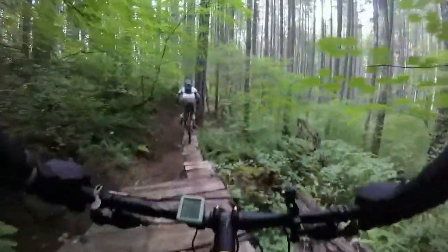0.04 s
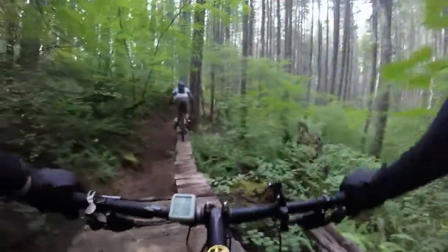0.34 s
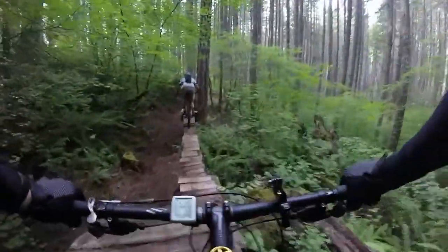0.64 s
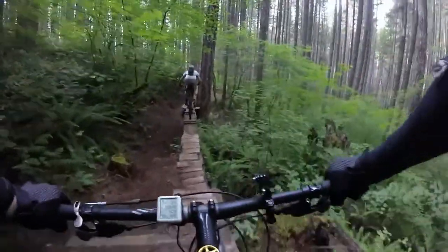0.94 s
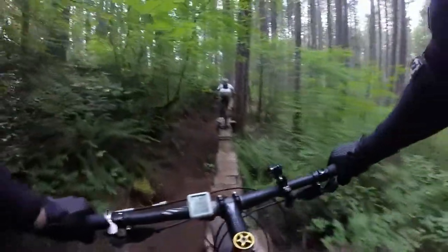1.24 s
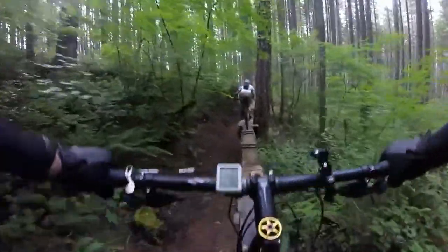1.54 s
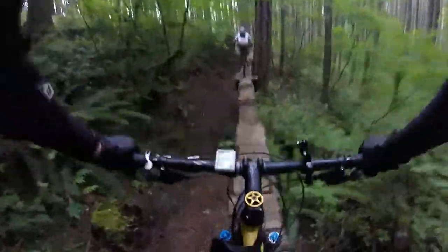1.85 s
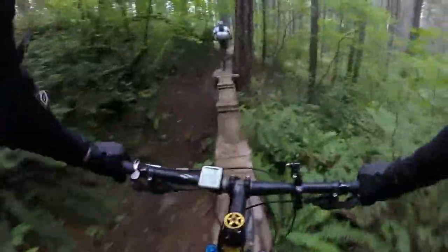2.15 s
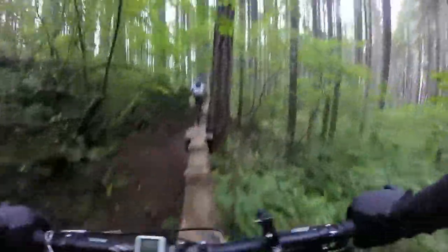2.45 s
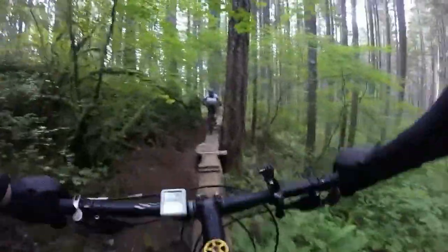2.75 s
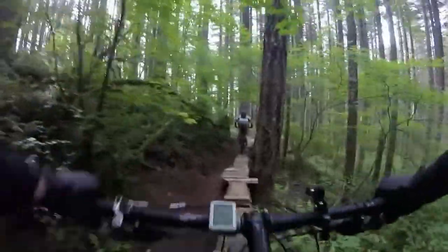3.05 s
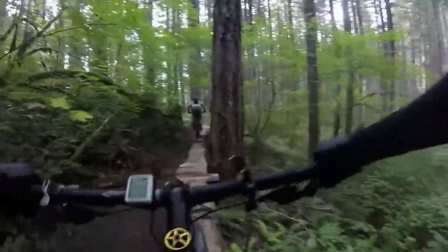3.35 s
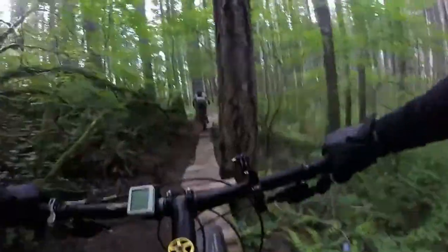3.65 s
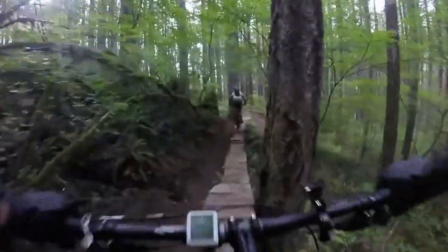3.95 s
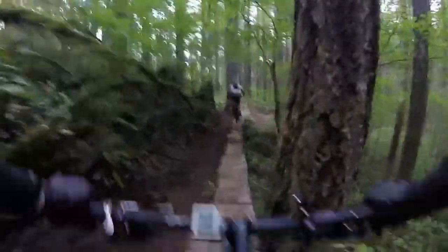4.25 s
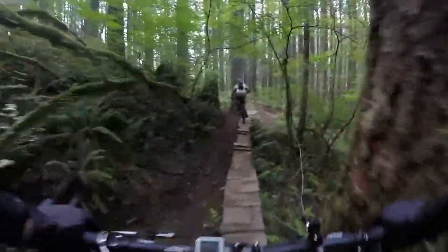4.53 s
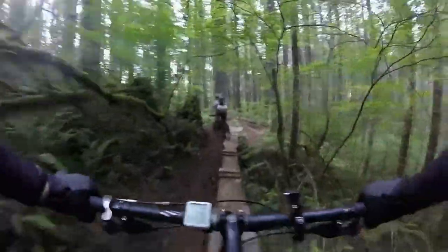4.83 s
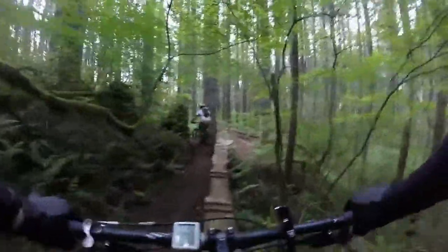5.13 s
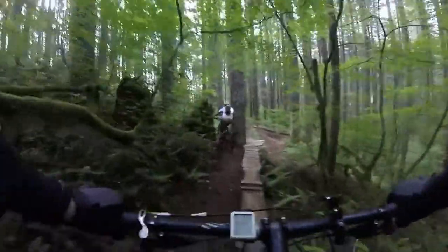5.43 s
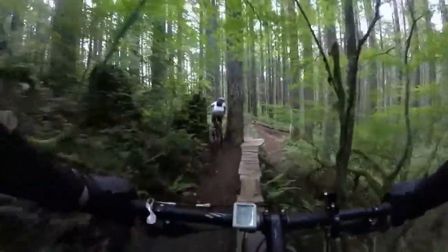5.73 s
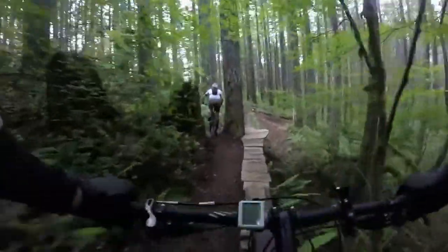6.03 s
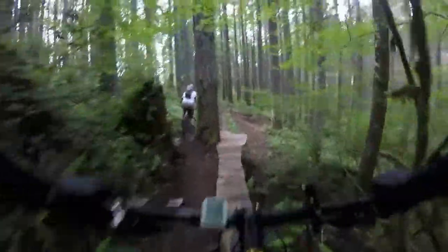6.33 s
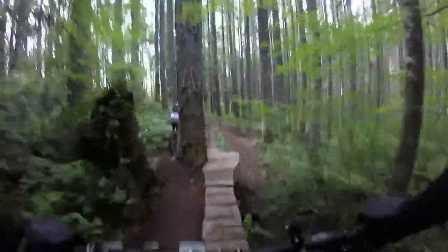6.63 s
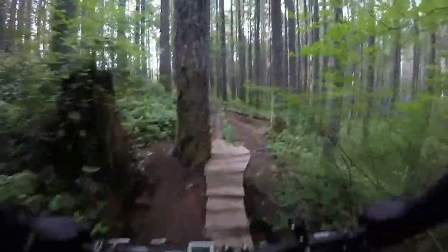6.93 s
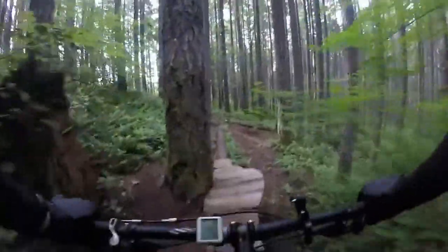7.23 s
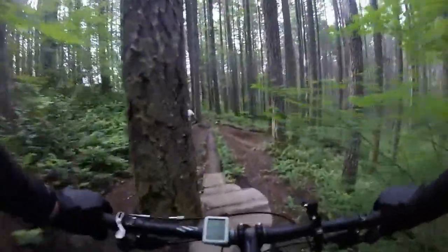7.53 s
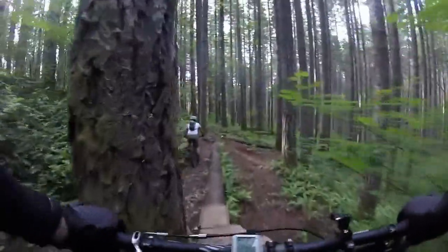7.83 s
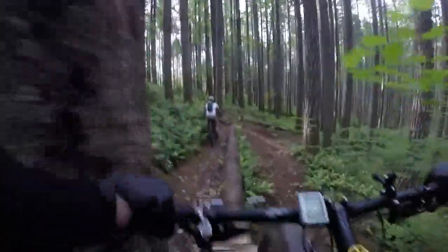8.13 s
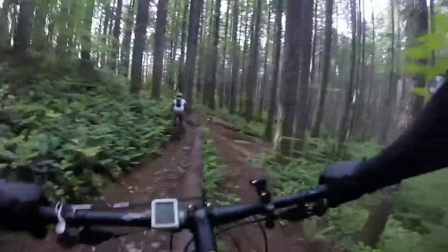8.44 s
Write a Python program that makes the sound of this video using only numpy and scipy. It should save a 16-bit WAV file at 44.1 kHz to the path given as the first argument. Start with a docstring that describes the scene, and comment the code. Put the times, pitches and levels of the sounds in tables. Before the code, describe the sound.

Bike tyres crunch and thud along a boardwalk while the chain clacks and brakes chirp, over rushing air and a soft double pulse.

```python
"""Mountain bike on a forest boardwalk

Heard from the rider's chest, a bike coasts over planks in a soft rush of air. The tyres crunch on grit
and thump on the boards; drops jolt the frame and make chain and cables clack. The freehub ticks and rasps
once, a brake disc scrapes and squeaks, and a soft double pulse, likely the rider's heart, beats below."""
import sys
import numpy as np
from scipy import signal
from scipy.fft import rfft, irfft, next_fast_len
from scipy.io import wavfile
from scipy.ndimage import uniform_filter1d

SR = 44100
rng = np.random.default_rng(int(sys.argv[2]) if len(sys.argv) > 2 else 0)


def put_to_file(sound):
    """Save the sound as 16-bit audio at rate SR, in the file named by the first command-line argument."""
    columns = np.atleast_2d(sound).T  # one column per channel
    safe = np.clip(columns, -1, 1)
    whole_steps = np.round(safe * 32767)
    wavfile.write(sys.argv[1], SR, whole_steps.astype(np.int16))


N = 378378
TIME = np.arange(N) / SR


def gain_of(db):
    """Decibels to amplitude."""
    return 10 ** (np.asarray(db) / 20)


def unit_rms(x):
    """Scales to an rms of one."""
    return x / np.sqrt(np.mean(x ** 2) + 1e-20)


def unit_peak(x):
    """Scales the loudest 3 ms to an rms of one."""
    return x / np.sqrt(uniform_filter1d(x ** 2, 130).max() + 1e-20)


def level(rows):
    """Gain along a curve of (s, dB)."""
    return gain_of(np.interp(TIME, *np.transpose(rows)))


def add(mix, start_s, sound):
    """Lays a sound into the mix."""
    part = mix[max(round(start_s * SR), 0):][:len(sound)]
    part += sound[:len(part)]


def coloured(x, points):
    """Shapes the spectrum by (Hz, dB) points, at unit rms."""
    point_hz, point_db = np.transpose(points)
    size = next_fast_len(len(x))
    hz = np.fft.rfftfreq(size, 1 / SR)
    curve_db = np.interp(np.log(hz + 1), np.log(point_hz + 1), point_db)
    return unit_rms(irfft(rfft(x, size) * gain_of(curve_db), size)[:len(x)])


def band(x, lo_hz, hi_hz, order=2):
    """Causal band-pass."""
    return signal.sosfilt(signal.butter(order, [lo_hz, hi_hz], "bandpass", fs=SR, output="sos"), x)


def drift(per_s):
    """Smooth noise at unit rms, changing about per_s times a second."""
    size = next_fast_len(N)
    hz = np.fft.rfftfreq(size, 1 / SR)
    spectrum = rfft(rng.standard_normal(size)) * np.exp(-(hz / per_s) ** 2)
    return unit_rms(irfft(spectrum, size)[:N])


def swell(peak_s, length_s, rise_share):
    """Gain that peaks at one and stays within 20 dB of that for length_s."""
    out, on = np.zeros(N), abs(TIME - peak_s) < 3 * length_s
    t = TIME[on] - peak_s
    out[on] = gain_of(-20 * np.maximum(-t / rise_share, t / (1 - rise_share)) / length_s)
    return out


def push(hz, rise_cycles, sharpness):
    """A heavily damped swing that builds and dies within a few cycles."""
    cycles = hz * np.arange(SR // 4) / SR
    rise = cycles / rise_cycles
    return (rise * np.exp(1 - rise)) ** sharpness * np.sin(2 * np.pi * cycles)


def struck(modes, t, detune=1):
    """Modes of (Hz, dB, t60 s) that start together and die away."""
    return sum(gain_of(db - 60 * t / t60) * np.sin(2 * np.pi * hz * detune * t) for hz, db, t60 in modes)


def resonator(x, hz, width_hz):
    """One driven mode."""
    return signal.lfilter(*signal.iirpeak(hz, hz / width_hz, SR), x)


def resonances(x, modes):
    """Drives modes of (Hz, width Hz, dB), at unit rms."""
    return unit_rms(sum(gain_of(db) * unit_rms(resonator(x, hz, width)) for hz, width, db in modes))


# Shaking of bike and rider, with wind. Each row: time in seconds, relative level in dB.
SHAKE_LEVEL = [(0.0, -35.5), (0.36, -44), (1.74, -44), (2.1, -37), (3.18, -39), (3.61, -38.5), (3.8, -32),
               (4.44, -37.5), (5.23, -40.5), (5.83, -44), (6.24, -33.5), (7.07, -36.5), (7.31, -33.5),
               (7.74, -39.5), (8.05, -44), (8.58, -33)]
# Its spectrum. Each row: frequency in Hz, relative density in dB.
SHAKE_SPECTRUM = [(6, -24.5), (12, 4), (25, 0), (34, -3.5), (46, -12), (60, -13.5), (90, -24), (140, -29),
                  (200, -37.5), (330, -42.5), (500, -44.5), (1100, -100)]

def shake(split_hz=48, calm_db=-42, rumble_exponent=0.6):
    """Low sway, evened out by the suspension, swells at each drop; the rumble above it grows less."""
    noise = coloured(rng.standard_normal(N), SHAKE_SPECTRUM)
    noise /= np.sqrt(uniform_filter1d(noise ** 2, 3000) + 0.02)
    sway = signal.sosfiltfilt(signal.butter(4, split_hz, fs=SR, output="sos"), noise)
    rumble = gain_of(-1) * (noise - sway)
    drops = sum(gain_of(db - 18) * swell(s, length_s=0.33, rise_share=0.33) for s, db, _ in JOLTS)
    unrest = np.hypot(gain_of(1) * level(SHAKE_LEVEL), drops) / gain_of(calm_db)
    return gain_of(calm_db) * (sway * unrest + rumble * unrest ** rumble_exponent)


# Tyres rolling on wood. Each row: time in seconds, level in dB.
ROLLING_LEVEL = [(0.0, -55.5), (0.26, -62), (0.91, -63), (1.89, -61.5), (2.08, -50), (2.2, -61.5),
                 (2.56, -49.5), (2.77, -60), (3.46, -60.5), (3.78, -56.5), (4.44, -55.5), (4.99, -62.5),
                 (5.59, -62.5), (6.71, -55.5), (6.86, -58.5), (7.86, -62.5), (8.46, -54.5), (8.58, -53)]
# A tyre pressed or steered hard. Each row: peak time in seconds, length in seconds, level in dB.
SCUFFS = [(1.637, 0.15, -51.5), (1.928, 0.036, -48), (2, 0.1, -36), (2.498, .1, -47.5), (2.619, .09, -47),
          (3.03, 0.31, -51.5), (3.732, 0.19, -45.5), (4.2, 0.053, -47.5), (4.282, 0.085, -45),
          (4.765, 0.085, -52), (6.354, .12, -63), (6.497, 0.07, -59), (6.62, .16, -50), (7.131, 0.2, -50.5),
          (7.29, 0.16, -55.5), (8.065, 0.32, -56), (8.306, 0.19, -42), (8.43, 0.24, -56)]

def tyre_load():
    """How hard the tyres work: rolling plus scuffs."""
    scuffing = sum(gain_of(db) * swell(s, length_s, rise_share=0.55) for s, length_s, db in SCUFFS)
    return np.hypot(level(ROLLING_LEVEL), scuffing)


def grit(grains_per_s=600, spread_db=3.5):
    """Crushed grains snap for a few cycles, each size at its own pitch."""
    out, t = np.zeros(N), np.arange(SR // 100) / SR
    pitches_hz = np.geomspace(900, 7000, num=14)
    for hz in pitches_hz:
        at = np.flatnonzero(rng.random(N) < grains_per_s / len(pitches_hz) / SR)
        impulses = np.zeros(N)
        impulses[at] = gain_of(spread_db * np.minimum(rng.exponential(1, N)[at], 4))
        snap = np.sin(2 * np.pi * hz * t) * np.exp(-hz * t / 2) * hz
        out += signal.oaconvolve(impulses, snap)[:N]
    return unit_rms(out)


# Crunch on gritty wood. Each row: frequency in Hz, relative density in dB.
TYRE_SPECTRUM = [(180, -30), (300, -11), (610, -10.5), (968, -7.5), (1120, -10), (1350, -4.5), (1540, -9),
                 (1670, -3), (2480, -5), (2740, -8), (3070, -10.5), (6250, -16.5), (7020, -22.5),
                 (10400, -31), (15500, -40)]

def tyres(frame_db=-7, grit_db=-5, drum_db=-8, knee_db=-65.5, flutter_db=2.5):
    """Knobs scrub the wood and crush grit; the frame rings along and the tread drums on the boards."""
    scrub = rng.standard_normal(N) + gain_of(frame_db) * resonances(rng.standard_normal(N), FRAME_MODES[1:])
    crunch = coloured(unit_rms(scrub) + gain_of(grit_db) * grit(), TYRE_SPECTRUM)
    drum = gain_of(drum_db) * unit_rms(band(rng.standard_normal(N), 105, 297))
    load = tyre_load()
    load = load ** 2 / np.hypot(load, gain_of(knee_db))  # light rolling sinks under the air
    return gain_of(flutter_db * drift(24)) * load * (crunch + drum)


# Passing air. Each row: frequency in Hz, relative density in dB.
AIR_SPECTRUM = [(120, -35), (200, -6.5), (333, -6), (665, -9), (1150, -11.5), (1330, -11), (1950, -15),
                (8200, -28), (13400, -37.5), (15500, -50)]

def air(db=-61.5, waver_db=0.97):
    """Soft rush of air past the rider."""
    return gain_of(db + waver_db * drift(12.4)) * coloured(rng.standard_normal(N), AIR_SPECTRUM)


# Frame and bars. Each row: frequency in Hz, width in Hz, gain in dB.
FRAME_MODES = [(1000, 220, 1), (1364, 71, -1), (1705, 113, 2), (2580, 540, 5.5), (3024, 150, 6),
               (3750, 150, 3), (4514, 150, 0), (4860, 270, -6.5), (6325, 120, -1), (7750, 210, -2),
               (10250, 260, -9.5), (11060, 300, -15)]

def frame(x, direct):
    """The bike resonates; a share of the sound passes straight through."""
    return direct * x + sum(gain_of(db) * resonator(x, hz, width) for hz, width, db in FRAME_MODES)


# Ticking that gets past the rider's body. Each row: time in seconds, relative level in dB.
TICK_LEVEL = [(0, -68), (.7, -64.5), (1.6, -69), (3, -64), (4.6, -65.5), (5.1, -85), (5.7, -76),
              (6.4, -67.5), (7.3, -70), (8.58, -68.5)]

def freehub_ticks(db=-5, teeth_per_s=50, unevenness=0.18, snap_s=0.0079, spread_db=2.5):
    """Pawls snap faintly over the ratchet at a wandering rate."""
    teeth = np.floor(np.cumsum(teeth_per_s * np.exp(unevenness * drift(12))) / SR)
    clicks = np.diff(teeth, prepend=0) * gain_of(spread_db * rng.standard_normal(N))
    decays = signal.lfilter([1], [1, -np.exp(-1 / (snap_s * SR))], clicks)
    snaps = frame(decays * rng.standard_normal(N), direct=0.23)
    return gain_of(db) * level(TICK_LEVEL) * unit_rms(band(snaps, 4900, 12100))


# Pads touching the disc. Each row: peak time in seconds, length in seconds, level in dB.
PAD_TOUCHES = [(0, 0.034, -41), (.09, 0.17, -52), (0.222, 0.17, -55.5), (4.52, 0.089, -54.5),
               (4.562, 0.085, -48)]
# The disc's low modes. Each row: frequency in Hz, width in Hz, relative level in dB.
DISC_MODES = [(1354, 26, 1.5), (1594, 38, -0.5), (2010, 56, -3), (2520, 35, 0)]

def brake_drag(scrape_db=-7, judder_db=2):
    """The pads scrape and judder on the disc and keep it ringing."""
    pressure = sum(gain_of(db) * swell(s, length_s, rise_share=0.53) for s, length_s, db in PAD_TOUCHES)
    rub = rng.standard_normal(N)
    scrape = gain_of(scrape_db) * unit_rms(band(rub, 380, 1800))
    return gain_of(judder_db * drift(90)) * (resonances(rub, DISC_MODES) + scrape) * pressure


# The disc sings. Each row: peak time in seconds, length in seconds, pitch in Hz, glide in Hz per second,
# waver in Hz, level in dB.
SQUEAKS = [(.003, 0.078, 1570, 0, 100, -48), (0.083, .05, 14800, 0, 100, -68),
           (.105, 0.2, 1350, -2, 50, -53.5), (.16, .06, 15260, 0, 30, -66),
           (2.411, .03, 4800, 15000, 300, -46), (2.471, .04, 4500, -15000, 300, -52),
           (4.488, .02, 3200, -5000, 200, -49.5), (4.565, .1, 1360, -2, 60, -51),
           (7.093, 0.053, 11270, -2200, 45, -34), (7.342, .05, 6850, 0, 100, -65),
           (7.42, .04, 8000, 0, 100, -68), (7.878, 0.077, 11800, -13000, 50, -64)]

def brake_squeaks(grab_db=2):
    """Disc modes waver in pitch and level as the pad sticks and slips."""
    out, slip = np.zeros(N), drift(520)
    grab = gain_of(grab_db * drift(150))
    for s, length_s, hz, glide_hz_per_s, waver_hz, db in SQUEAKS:
        on = abs(TIME - s) < 3 * length_s
        pitch_hz = hz + glide_hz_per_s * np.clip(TIME[on] - s, -length_s, length_s) + waver_hz * slip[on]
        tone = np.sqrt(2) * np.sin(2 * np.pi * np.cumsum(pitch_hz) / SR)
        out[on] += gain_of(db) * swell(s, length_s, rise_share=0.22)[on] * tone
    return grab * out


# The two thuds of a beat. Each row: delay in seconds, level in dB, pitch in Hz.
BEAT_THUDS = [(0, -34.5, 84), (0.229, -44.5, 95)]

def heartbeat(first_s=0.046, period_s=0.465, heave_db=-37, heave_hz=27, lead_s=0.021, spread_db=1.1):
    """A steady, soft double thud in the chest; a low heave leads each pair."""
    out, starts = np.zeros(N), np.arange(first_s, N / SR, period_s)
    heave = push(heave_hz, rise_cycles=0.67, sharpness=1)
    for s, (force, tone) in zip(starts, rng.standard_normal((len(starts), 2))):
        add(out, s - lead_s, gain_of(heave_db + spread_db * force) * heave)
        for delay_s, db, hz in BEAT_THUDS:
            thud = push(hz * np.exp(0.07 * tone), rise_cycles=0.67, sharpness=1)
            add(out, s + delay_s, gain_of(db + spread_db * force) * thud)
    return out


def loose_parts(count=48, max_load_db=-53, spread_db=3.5, hardness_db=5):
    """Faint random clacks that grow with tyre load, as rows like those of CLACKS."""
    load_db = np.minimum(20 * np.log10(tyre_load()), max_load_db)
    at = ((np.arange(count) + rng.random(count)) * N / count).astype(int)
    return [(i / SR, load_db[i] - 1.5 + spread_db * force, hardness_db + 3 * tone)
            for i, (force, tone) in zip(at, rng.standard_normal((count, 2)))]


# Chain, cables and frame. Each row: start in seconds, level in dB, hardness (ring over body) in dB.
CLACKS = [(0.0714, -35, -9), (0.085, -39, -10), (0.0934, -36.5, -8), (0.1128, -40, -26), (1.0735, -44, 2.5),
          (1.154, -48.5, 7), (1.498, -47, 1.5), (1.9357, -43, 9), (1.956, -34.5, 0.5), (2.0178, -37, -4),
          (2.2182, -39, -24), (2.2462, -42.5, 15), (2.2793, -40, -19), (2.3486, -32.5, 10),
          (2.5059, -31.5, 0), (2.59, -44, -0.5), (2.6994, -31.5, 3.5), (2.809, -49, 0), (3.6572, -44, -19),
          (3.689, -35.5, -3), (3.7238, -33.5, 11), (3.7404, -42, 3), (3.91, -45.5, -2), (4.1213, -49, 13),
          (4.1699, -47, 5), (4.1966, -47, -2), (4.3319, -39, -22), (4.5348, -36.5, 11.5), (4.7004, -46, -1),
          (5.831, -47.5, 0.5), (6.264, -37.5, 11.5), (6.3448, -47, 1.5), (6.6054, -40.5, 11),
          (7.034, -44, -0.5), (7.097, -46, 5), (7.153, -51, -3), (7.2874, -52.5, 9), (8.3401, -42.5, 7)]

def clacks(attack_s=0.00018, contact_s=0.0025, tail_db=-22, tail_s=0.017, tick_db=-14):
    """Contacts ring the frame; strong ones chatter longer, hard ones tick, loose parts buzz on briefly."""
    out, t = np.zeros(N), np.arange(SR // 10) / SR
    attack = 1 - np.exp(-t / attack_s)
    tail = gain_of(tail_db) * np.exp(-t / tail_s)
    for s, db, hardness_db in CLACKS + loose_parts():
        chatter_s = contact_s * np.exp(0.0968 * (db + 35.5))
        contact = attack * (np.exp(-t / chatter_s) + tail)
        blow = frame(rng.standard_normal(len(t)) * contact, direct=0.2)
        body_db, ring_db = -max(hardness_db, 0), min(hardness_db, 0)
        body = gain_of(body_db) * unit_peak(band(blow, 770, 2270))
        ring = gain_of(ring_db) * unit_peak(band(blow, 3950, 5960, order=3))
        tick = gain_of(tick_db + 0.76 * hardness_db + ring_db / 2) * unit_peak(band(blow, 6440, 12000))
        add(out, s, gain_of(db) * (body + ring + tick))
    return out


def small_bumps(count=60, over_shake_db=-6, spread_db=3, hz=105):
    """Uneven boards nudge the tyres at random, harder where the bike shakes more."""
    out, shaking = np.zeros(N), level(SHAKE_LEVEL)
    for i, (force, tone) in zip(rng.integers(0, N, count), rng.standard_normal((count, 2)).clip(-2, 2)):
        nudge = push(hz * np.exp(0.3 * tone), rise_cycles=0.7, sharpness=1.17)
        add(out, i / SR, shaking[i] * gain_of(over_shake_db + spread_db * force) * nudge)
    return out


# A quick kick of the pedals: start in seconds, length in seconds, level in dB.
PEDAL_KICK = (1.849, 0.09, -42.5)
# The hub shell. Each row: frequency in Hz, width in Hz, relative level in dB.
HUB_MODES = [(1690, 370, 7), (3100, 260, 6), (3860, 210, 6), (5090, 310, 2), (6130, 230, 9), (6200, 60, -5),
             (7400, 80, -11), (7600, 330, 2), (9450, 350, -25)]

def freehub_rasp(teeth_per_s=560, stutter_per_s=100, slack_db=-9, fade_db_per_s=-35, direct_db=-6):
    """Pawls race over the teeth in quick stutters and ring the hub shell."""
    s, length_s, db = PEDAL_KICK
    grip, t = np.zeros(N), np.arange(0, length_s, 1 / SR)
    slack = stutter_per_s * t % 1 > 3 / 4
    add(grip, s, gain_of(db + fade_db_per_s * t + slack_db * slack))
    tooth_decays = np.exp(-2 * (teeth_per_s * TIME % 1))
    chatter = unit_rms(grip * rng.standard_normal(N) * tooth_decays)
    shell = resonances(chatter, HUB_MODES) + gain_of(direct_db) * chatter
    return unit_rms(band(shell, 1100, 9800, order=5)) * np.sqrt(np.mean(grip ** 2))


# The suspension bottoms after a drop. Each row: start in seconds, level in dB, sway in Hz.
JOLTS = [(1.937, -11.5, 34.5), (2.063, -7.5, 25.3), (2.594, -13.5, 19.2), (3.764, -17.5, 21.3),
         (4.195, -19.5, 21), (4.313, -10.5, 20.3), (4.779, -23, 15.7), (6.193, -18.5, 19.5),
         (6.731, -14.5, 22.7), (8.305, -19, 20.5)]

def jolts():
    """Each drop sets off one heavily damped heave of bike and rider."""
    out = np.zeros(N)
    for s, db, hz in JOLTS:
        add(out, s, gain_of(db) * push(hz, rise_cycles=0.645, sharpness=5.5))
    return out


# A tyre meets a plank. Each row: start in seconds, relative boom level in dB, boom pitch in Hz,
# relative knock level in dB.
THUMPS = [(1.971, -23, 141, -36), (1.985, -23, 134, -46), (2.0469, -16, 123, -38),
          (2.071, -10.5, 98, -24.5), (2.925, -31, 143, -36.5), (3.547, -39, 110, -34.5),
          (3.6765, -27, 127, -31), (3.7, -15.5, 116, -22.5), (3.7865, -27, 89, -42),
          (4.3325, -13, 103, -28.5), (4.3952, -25, 116, -44), (6.211, -24.5, 99, -38.5),
          (6.6562, -25, 136, -39), (6.751, -22, 137, -31.5), (7.071, -29, 122, -27.5),
          (8.2542, -32, 122, -41), (8.284, -22.5, 127, -29.5), (8.3088, -27.5, 146, -32),
          (8.525, -32, 108, -54)]
# A plank's modes. Each row: frequency in Hz, relative level in dB, t60 in seconds.
PLANK_MODES = [(221.5, 4, 0.024), (317, -5.5, 0.027), (520, -9, 0.016), (743, -13.5, 0.042)]

def thumps(contact_s=0.0013, lead_s=0.0016, pitch_spread=0.063):
    """A short low boom of the air-filled tyre and a dull plank knock sound together."""
    out, t = np.zeros(N), np.arange(SR // 8) / SR
    attack = 1 - np.exp(-(t / contact_s) ** 2)
    detunes = np.exp(pitch_spread * rng.standard_normal(len(THUMPS)))
    for (s, boom_db, hz, knock_db), detune in zip(THUMPS, detunes):
        add(out, s - lead_s, gain_of(boom_db - 1) * push(hz, rise_cycles=0.49, sharpness=1.24))
        add(out, s, gain_of(knock_db + 3) * attack * struck(PLANK_MODES, t, detune))
    return out


# The rear wheel lands: start in seconds, gain in dB.
LANDING = (2.0826, -12.5)
# Modes of the crack. Each row: frequency in Hz, relative level in dB, t60 in seconds.
LANDING_MODES = [(805, -22.5, 0.073), (1440, -7.5, .028), (1790, -31, .17), (1855, 12, 0.0043),
                 (2400, -9, 0.013), (3520, -12.5, 0.013)]

def landing(attack_s=0.00044):
    """The bike hits its stop with one short, hard crack."""
    s, db = LANDING
    out, t = np.zeros(N), np.arange(SR // 10) / SR
    add(out, s, gain_of(db) * (1 - np.exp(-t / attack_s)) * struck(LANDING_MODES, t))
    return out


def forest_echo(x, wet_db=-19, t60_s=0.09, tap_share=0.05, delay_s=0.006):
    """Trunks and boards add a thin, scattered echo."""
    t = np.arange(SR // 2) / SR
    taps = rng.standard_normal(len(t)) * (rng.random(len(t)) < tap_share)
    taps *= gain_of(-60 * t / t60_s) * (t > delay_s)
    return x + gain_of(wet_db) * signal.fftconvolve(x, taps / np.linalg.norm(taps))[:N]


def scene():
    """Low shaking and thumps under the bright noises of the bike, in mono."""
    metal = clacks() + landing() + freehub_ticks() + freehub_rasp() + brake_drag() + brake_squeaks()
    lows = shake() + jolts() + heartbeat() + thumps()
    return (lows + tyres() + air() + forest_echo(metal) + small_bumps())[None]


def record(dry, low_hz=6, top_hz=15400):
    """The microphone blocks the slowest sway; the camera cuts the top treble."""
    dry = signal.sosfilt(signal.butter(1, low_hz, "highpass", fs=SR, output="sos"), dry)
    lowpass = signal.firwin(255, top_hz, window=("kaiser", 9), fs=SR)
    return signal.oaconvolve(dry, lowpass[None], "same")


dry = scene()
out = record(dry)
put_to_file(out)
```